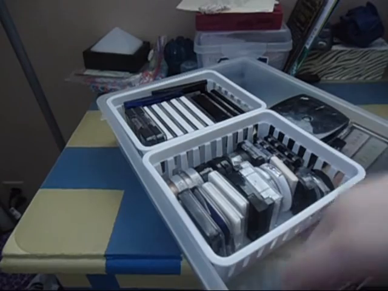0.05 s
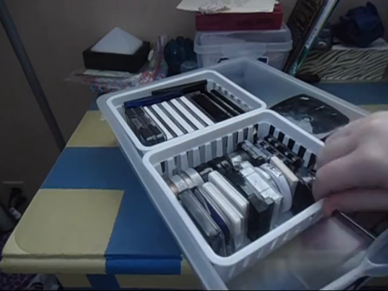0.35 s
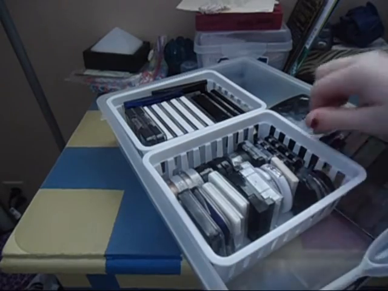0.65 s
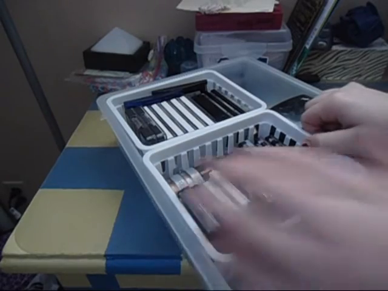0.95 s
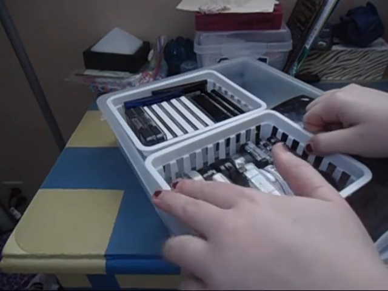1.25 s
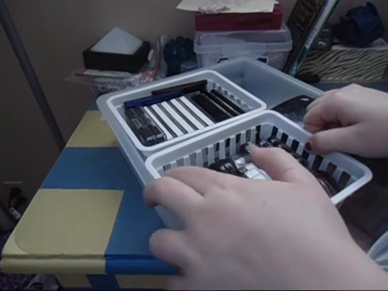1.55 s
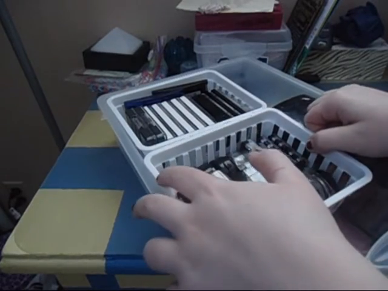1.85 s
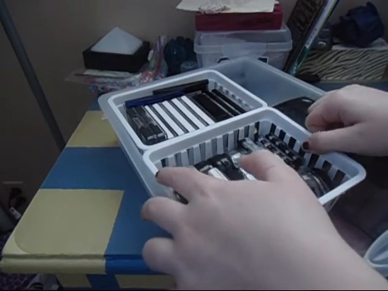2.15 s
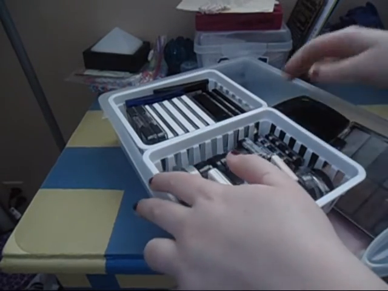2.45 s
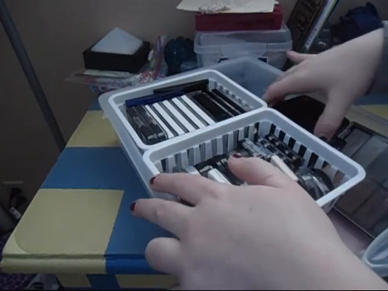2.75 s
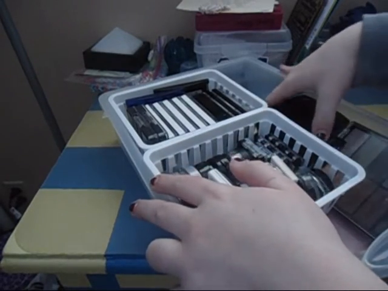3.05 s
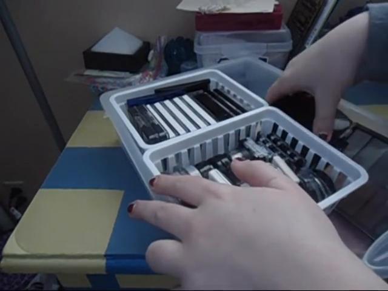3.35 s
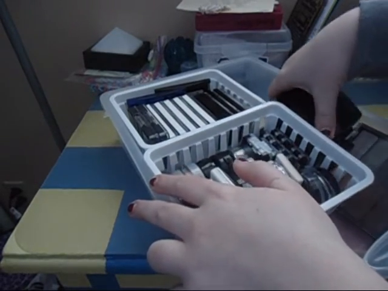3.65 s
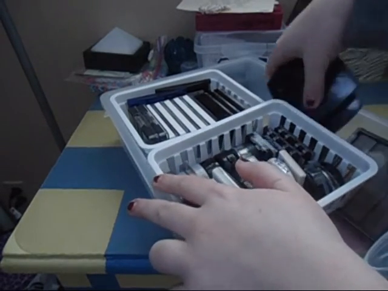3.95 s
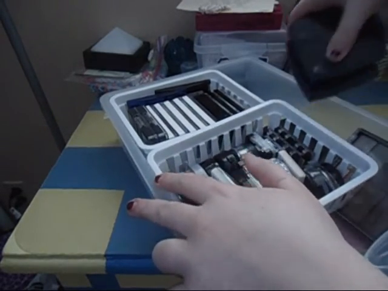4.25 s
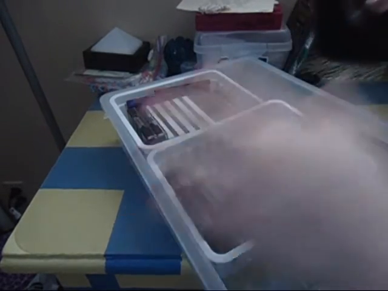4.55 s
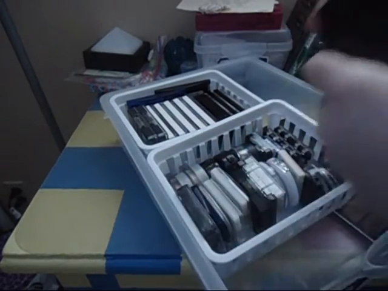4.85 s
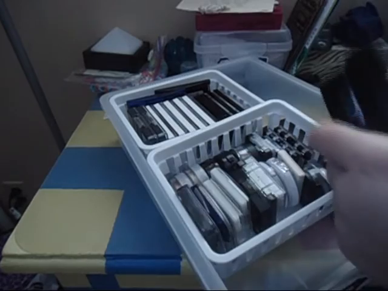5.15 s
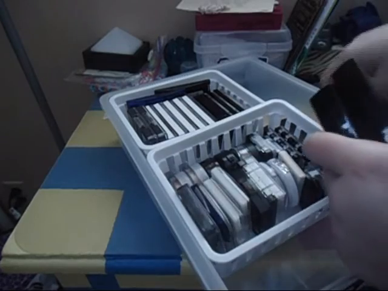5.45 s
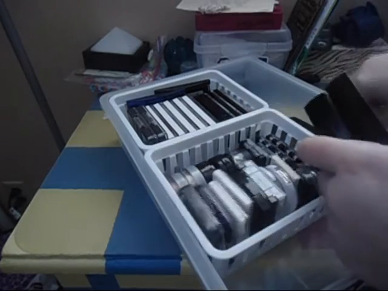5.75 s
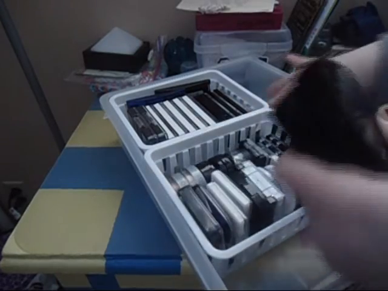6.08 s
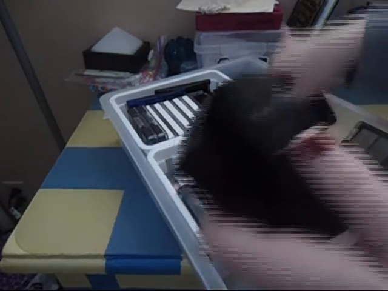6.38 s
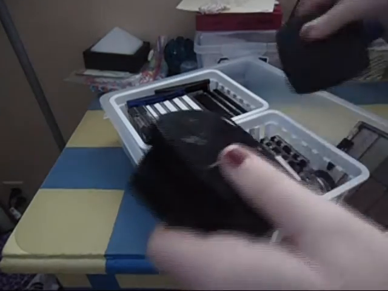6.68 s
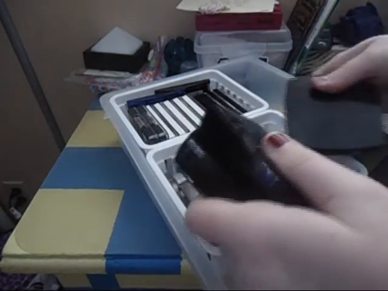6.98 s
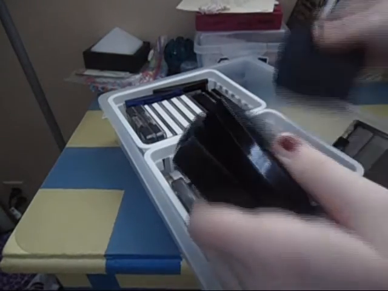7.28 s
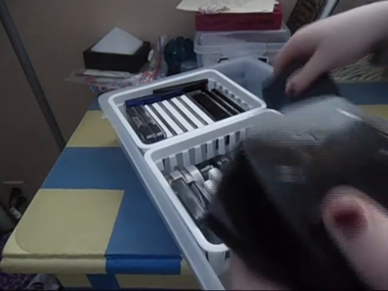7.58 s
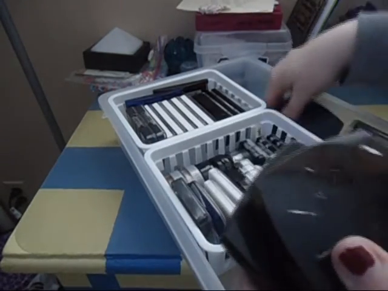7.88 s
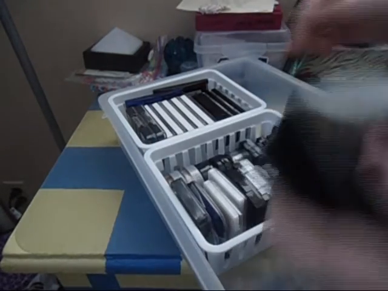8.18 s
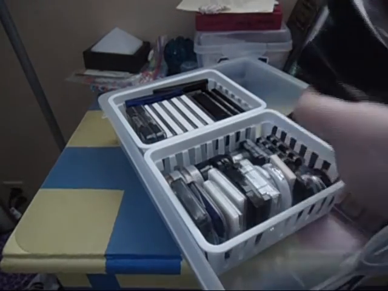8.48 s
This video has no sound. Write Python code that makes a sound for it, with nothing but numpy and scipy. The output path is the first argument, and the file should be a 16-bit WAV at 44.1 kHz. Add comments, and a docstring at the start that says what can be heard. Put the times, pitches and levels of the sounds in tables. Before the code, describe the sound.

In a small furnished room, plastic cases tick and rub softly against each other and a basket wall. The knocks grow firmer until a tight, squeaky slide breaks into a short rattling clatter. Lighter clacks follow, then several hollow knocks on a plastic tub and a last rub. The sound is dull and only in the left channel, over low room rumble and microphone hiss.

```python
"""Plastic make-up compacts are sorted by hand in a basket inside a storage tub, in a small furnished room.
First, light knocks, fingertip squeaks, taps on the basket wall and the dry rasp of sliding cases.
The knocks firm up; near 5.4 s a tight slide squeaks into the loudest clatter, then a smaller flurry.
From 7.5 s the held compact knocks on the tub, and a few last ticks and rubs close the scene.
A dull little microphone, live on the left only, hears it all over room rumble and its own hiss."""
import sys
import numpy as np
from scipy import signal
from scipy.fft import rfft, irfft
from scipy.io import wavfile
from scipy.ndimage import uniform_filter1d, map_coordinates

SR = 44100
rng = np.random.default_rng(int(sys.argv[2]) if len(sys.argv) > 2 else 0)


def inscribe(sig):
    """Save sig as 16-bit PCM at rate SR to the path in sys.argv[1].

    A 1-D sig is mono; a 2-D sig holds one channel per row.
    Samples are clipped to [-1, 1] before scaling.
    """
    pcm = np.round(np.clip(np.atleast_2d(sig).T, -1, 1) * 32767)
    wavfile.write(sys.argv[1], SR, pcm.astype(np.int16))


N = 380141

# Room rumble and microphone hiss. Each row: frequency in Hz, relative level in dB.
FLOOR_SPECTRUM = [(15, -4.5), (30, 2.5), (80, 0), (160, -5), (400, -10.5), (1000, -16), (2500, -20.5),
                  (4500, -22.5), (9000, -27.5)]
# Case against case. Each row: start in seconds, level in dB, shell resonance in Hz,
# hardness of the contact in dB, seconds until the rebound (0 for a case held fast).
CASE_KNOCKS = [(0.13, -53, 983, -13, 0.0097), (0.514, -52.5, 1196, -23, 0), (0.624, -50.5, 1003, -5.5, 0),
               (0.938, -62.5, 900, -7, 0.012), (1.048, -62.5, 1380, -10, 0.016),
               (1.203, -57.5, 840, -12, 0.024), (1.287, -56, 855.8, -14.5, 0.0074),
               (1.312, -68.5, 1500, 3, 0.0016), (1.352, -60, 590, -8, 0.008),
               (1.409, -65.5, 1300, 2, 0.012), (2.111, -51, 850, -11, 0), (2.22, -57, 494, -1, 0.00015),
               (2.33, -52.5, 1510, -4.5, 0), (2.366, -54, 1042, 11, 0.001), (2.456, -53.5, 639, -7.5, 0),
               (2.711, -55.5, 720, -17, 0.023), (2.81, -58.5, 723, -14, 0.016),
               (3.24, -59, 925, -6, 0.0069), (3.337, -54, 561, -34, 0.0206),
               (3.383, -50, 775.8, -10.5, 0.006), (3.434, -58, 798, -8, 0.028),
               (3.52, -51.5, 1176, -31, 0.011), (3.717, -37, 589, -11.5, 0.0093),
               (3.766, -40.5, 566, -35, 0), (3.803, -50, 595, -19, 0.027),
               (3.829, -56.5, 696, 3.5, 0.00086), (3.882, -49, 596, -17.5, 0.012),
               (3.984, -44, 583, -23, 0), (4.022, -47, 1012, -13, 0.0069),
               (4.095, -60.5, 1370, -31, 0.0025), (4.243, -51.5, 658, -4.5, 0.027),
               (4.384, -46.5, 517.8, -15.5, 0.018), (4.589, -49.5, 1020, -14, 0.005),
               (4.81, -70, 1392, 2, 0.0025), (4.86, -59, 855, 5, 0.0046), (4.891, -59.5, 850, -5, 0.0086),
               (5.182, -47, 296, -25, 0.00087), (5.284, -36, 1045, -16, 0),
               (5.407, -39.5, 1120, -10, 0.00795), (5.496, -19, 1290, -7.5, 0.00047),
               (5.497, -25.5, 480, -14, 0), (5.61, -25, 1320, -9.5, 0), (5.611, -33, 700, -11.5, 0.018),
               (5.648, -23, 814, -15, 0), (5.66, -24, 718, -11, 0.0018), (5.676, -34, 1150, -8.5, 0),
               (5.723, -39, 682.6, -12.5, 0.0019), (5.745, -22.5, 490, -5.5, 0.0016),
               (5.766, -33.5, 930, -7, 0), (5.78, -21, 776, -5, 0.0139), (5.806, -20, 580, 3, 0.0048),
               (5.81, -22.5, 1240, -4, 0.0035), (5.817, -27, 1166, 1, .01), (5.863, -45, 1342, 5, 0.012),
               (5.889, -43, 1327, -4, 0.0024), (5.935, -60.5, 1290, 8.5, 0.0018),
               (6.238, -46, 985, -17.5, 0.023), (6.308, -53, 1191, -15.5, 0),
               (6.45, -40.5, 336.4, -2, 0.0048), (6.47, -35.5, 700, 3.5, 0.002),
               (6.478, -32, 610.2, -2, 0.01), (6.511, -39, 780, -8, 0.029),
               (6.54, -43, 520.6, -8.5, 0.00097), (6.554, -35, 719.5, -12.5, 0.0012),
               (6.592, -46.5, 1202, -12, 0.01), (6.617, -51.5, 1100, -12, 0.0024),
               (6.863, -50.5, 792, -9, 0.0088), (7.077, -45, 567.2, -9.5, 0), (7.132, -43, 941.1, -8.5, 0),
               (7.156, -55.5, 567.2, 3, 0.013), (7.271, -50.5, 570, -5.5, 0.01),
               (7.405, -54.5, 1620, -11, 0), (8.422, -53.5, 1420, 0, 0.015), (8.47, -39, 939, -5.5, 0),
               (8.524, -54, 1332, 1, 0.0113)]
# Sympathetic ring of basket and tub. Each row: pitch in Hz, relative level in dB,
# t60 in seconds before the cases damp it.
BASKET_MODES = [(197, -8, 0.15), (363, 3, 0.36), (460, 7.5, 0.13), (574.6, 7, 0.2), (1063, 2, 0.18),
                (1280, 5, 0.15), (1446, 1.5, 0.18), (2060, 2.5, 0.2), (2240, 4, 0.15), (2432, 3.5, 0.16),
                (2670, 3.5, 0.099), (2845, 5, 0.16), (3270, 3.5, 0.16), (4074, 1, 0.14)]
# Fingertips on a lid. Each row: start and end in seconds, squeak level in dB, pitch in Hz.
FINGERTIP_RUBS = [(0.677, 0.778, -80, 2540), (6.587, 6.641, -70, 2480), (7.43, 7.489, -73.5, 1645),
                  (7.74, 7.839, -69, 2420), (8.602, 8.655, -56.5, 2500)]
# The dry colour of rubbed plastic. Each row: frequency in Hz, relative level in dB.
RASP_SPECTRUM = [(150, -4), (400, -17.5), (1000, -2.5), (1500, 7), (1950, 0.5), (2550, 4), (2850, 2),
                 (3200, 0.5), (3700, -3.5), (4300, -3.5), (5000, -6), (6500, -5.5), (9000, -22)]
# Taps on the basket wall. Each row: start in seconds, ring level in dB, pitch of the struck spot in Hz,
# hardness in dB, fall of the modes away from that pitch in dB per octave.
WALL_STRIKES = [(0.844, -46.5, 1390, -0.5, 19), (0.858, -52, 1376, -2, 7), (1.502, -39.5, 1110, -7, 17),
                (1.641, -44, 1580, 8.5, 7), (1.646, -41.5, 664, -14, 17), (1.656, -52.5, 632, 6.5, 4),
                (2.034, -43.5, 600, 4, 6.5), (3.679, -37, 910, -1, 1), (3.922, -32.5, 1336, -2, 3),
                (3.929, -37, 560, -6, 12), (4.607, -41, 950, -6.5, 0), (6.337, -49, 1142, -12, 18)]
# Voice of the hollow basket wall. Each row: pitch in Hz, relative level in dB, t60 in seconds.
WALL_MODES = [(389.2, -5.5, 0.046), (548, -3, 0.05), (769, 1, 0.037), (930, 1.5, 0.026),
              (1060, -10.5, 0.034), (1253, -13, 0.065), (1400, -1, 0.039), (1470, 2.5, 0.018),
              (1597, -2.5, 0.037), (1840, -21, 0.057), (2670, -22, 0.04), (3140, -18, 0.09),
              (3790, -13, 0.04), (4215, -12, 0.04)]
# Case sliding on case. Each row: start and end in seconds, rasp level in dB, shell resonance in Hz,
# level of the hollow ring in dB.
CASE_SLIDES = [(1.1, 1.251, -79, 700, -64), (1.425, 1.65, -67.5, 840, -66.5),
               (1.497, 1.509, -52, 1300, -54), (2.013, 2.042, -61, 895, -57.5),
               (2.04, 2.089, -66.5, 650, -61), (2.191, 2.383, -71.5, 609, -67),
               (2.356, 2.364, -60, 900, -72.5), (3.212, 3.248, -64, 940, -62.5),
               (3.289, 3.453, -70, 760, -60), (3.473, 3.597, -67, 930, -57.5),
               (3.577, 3.753, -61, 1068, -58.5), (3.708, 3.87, -63, 600, -59), (3.924, 4.07, -61, 880, -56),
               (4.01, 4.047, -63, 1160, -60), (4.2, 4.265, -64, 900, -88),
               (5.265, 5.443, -64.5, 960, -58.5), (5.399, 5.54, -52, 1336, -55.5),
               (5.498, 5.571, -66, 632, -49), (5.61, 5.738, -47, 1252, -59), (5.701, 5.843, -43, 1050, -66),
               (5.812, 5.919, -41, 1000, -48.5), (6.274, 6.378, -63, 1084, -56),
               (6.338, 6.43, -57.5, 988, -65.5), (6.415, 6.481, -50, 950, -55.5),
               (6.463, 6.529, -44.5, 860, -51.5), (6.576, 6.637, -67, 950, -61),
               (7.098, 7.156, -69, 924, -63), (7.648, 7.727, -59.5, 790, -54.5),
               (7.921, 7.991, -52, 950, -52), (8.031, 8.103, -54.5, 965, -55.5),
               (8.084, 8.123, -53.5, 802, -53), (8.453, 8.496, -63.5, 875, -69),
               (8.483, 8.735, -60.5, 1120, -67)]
# Voice of the tightest slide. Each row: centre pitch in Hz, width in Hz, relative level in dB.
SQUEAK_RESONANCES = [(1290, 130, -7.5), (1600, 250, -8), (2390, 130, -2.5), (3100, 260, 4.5),
                     (3700, 260, -6), (4750, 410, -6)]
# The held compact on the tub. Each row: start in seconds, ring level in dB, pitch of the struck spot
# in Hz, hardness in dB, fall of the modes away from that pitch in dB per octave.
TUB_STRIKES = [(7.5645, -22.5, 527, -7.5, 3), (7.567, -26.5, 890, -5.5, 5), (7.648, -31.5, 700, -2.5, 2.5),
               (7.669, -39.5, 495, -2, 2), (7.919, -29.5, 650, -7.5, 5), (7.937, -35, 700, -9, 6),
               (7.959, -32, 824, -6.5, 15), (8.0697, -23, 825, -6.5, 21), (8.096, -33.5, 820, -3.5, 10.5)]
# Voice of that compact, damped by fingers. Each row: pitch in Hz, relative level in dB, t60 in seconds.
COMPACT_MODES = [(373, 1, 0.032), (558, -4, 0.062), (700, -5, 0.043), (781, -3, 0.048), (880, -1, 0.044),
                 (1010, -1, 0.049), (1290, -3.5, 0.044), (1414, -4, 0.035), (1594, -6.5, 0.041),
                 (1855, -9, 0.043), (2157, -6, 0.048), (2444, -11, 0.06), (2676, -11, 0.058),
                 (3230, -17, 0.093)]
# The microphone's dull tone. Each row: frequency in Hz, gain in dB.
MIC_RESPONSE = [(100, 8.5), (4000, 4), (4900, 2.5), (5550, -7.5), (6200, -4), (7000, -12.5), (7600, -15),
                (8200, -26.5)]

TOP_HZ = 8000  # treble cut-off
MIDDLING_DB = -35  # a middling blow; thud and rattle are scaled from it


def undb(db):
    """Decibels to gain."""
    return 10 ** (np.asarray(db) / 20)


def level(x, db):
    """Scale to an rms level."""
    return x * undb(db) / np.sqrt(np.mean(x ** 2))


def crest(x, db, size=132):
    """Scale so that the loudest few milliseconds have this level."""
    return x * undb(db) / np.sqrt(uniform_filter1d(x ** 2, size).max())


def fade(t, t60):
    """Exponential decay, 60 dB in t60 seconds."""
    return np.exp(-np.log(1000) * t / max(t60, 1e-3))


def band(x, lo_hz, hi_hz, order=3):
    """Causal band-pass."""
    sos = signal.butter(order, [lo_hz, min(hi_hz, SR / 2 - 1)], "band", fs=SR, output="sos")
    return signal.sosfilt(sos, x)


def colour(x, points, size=4096):
    """Causal EQ through (Hz, dB) points, made from the folded cepstrum."""
    hz, db = np.transpose(points)
    gain = undb(np.interp(np.log(np.fft.rfftfreq(size, 1 / SR) + 1), np.log(hz), db))
    cepstrum = irfft(np.log(gain))[:size // 2]
    cepstrum[1:] *= 2
    return signal.fftconvolve(x, irfft(np.exp(rfft(cepstrum, size))))[:len(x)]


def wander(rate):
    """A random value that glides to a new level this many times a second."""
    return np.interp(np.arange(N) / SR * rate, np.arange(N), rng.standard_normal(N))


def add(track, start, x):
    """Mix a sound into the track at a time in seconds."""
    i = max(int(start * SR), 0)
    track[i:i + len(x)] += x[:max(N - i, 0)]


def noise_floor(db=-62.5):
    """A steady bed of room rumble and microphone hiss."""
    return level(colour(rng.standard_normal(N), FLOOR_SPECTRUM), db)


def knock(shell_db, shell_hz, thud_db, clack_db, tick_db, ring_s, rise_s=0.00057, size=8192):
    """One contact: a shell note among dense, quickly damped plate modes, over a thud of the basket."""
    t = np.arange(size) / SR
    contact = 1 - np.exp(-t / rise_s)  # the force builds as the edges press together
    snap = undb(8) * (np.arange(size) == int(rise_s * SR))  # the first sharp touch

    def plate(lo_hz, hi_hz, t60, order=3):
        """Waves scattering through the case."""
        scatter = rng.choice([-1., 1.], size) * contact * fade(t, t60)
        return band(snap + scatter, lo_hz, hi_hz, order)

    # the fingers hold the case, so its main note is the first to die
    note = np.sin(2 * np.pi * shell_hz * t) * contact * fade(t, ring_s * .75)
    neighbours = plate(min(shell_hz * .7, 600), np.clip(shell_hz * 1.8, 1100, 1750), ring_s)
    shell = crest(note, 0) + crest(neighbours, 0)
    thud = plate(155, 490, ring_s * 1.44, order=2)
    clack = plate(1900, 3870, ring_s * 0.97)
    tick = plate(4500, 7150, ring_s * 0.94)
    return crest(shell, shell_db) + crest(thud, thud_db) + crest(clack, clack_db) + crest(tick, tick_db)


def held_cut_db(hz, held_hz=790, width_octaves=0.13, depth_db=-7):
    """Blows near the pitch of the large compact in the hand spare the basket by this much."""
    return depth_db * np.exp(-(np.log2(hz / held_hz) / width_octaves) ** 2)


def blow(db, hz, hard_db):
    """A hard contact brings out clack, tick and thud and is soon over; a soft one rings longer."""
    thud_db = -41.5 + 0.83 * (db - MIDDLING_DB) + 0.42 * hard_db + held_cut_db(hz)
    clack_db = db + hard_db
    ring_s = 0.031 * 2 ** (-hard_db / 39)  # 39 dB of hardness halves the ring
    return knock(db, hz, thud_db, clack_db, tick_db=clack_db - 4, ring_s=ring_s)


def rattle(sound, touches_per_s=560, after_s=0.0031, t60=0.15, size=6000):
    """A loose case chatters as it settles: a scatter of fading repeats of its contact."""
    t = np.arange(size) / SR
    touches = (rng.random(size) < touches_per_s / SR) * rng.uniform(-1.7, 1, size) * (t > after_s)
    return undb(-13.5) * signal.fftconvolve(sound, touches * fade(t, t60))


def case_knocks(rebound_db=-7):
    """Cases meet; loose ones rebound and rattle. Returns the sound and the part that shakes the basket."""
    out, shake = np.zeros(N), np.zeros(N)
    for start, db, hz, hard_db, rebound_s in CASE_KNOCKS:
        first = blow(db, hz, hard_db)
        add(out, start, first)
        add(shake, start, first * undb(held_cut_db(hz)))
        if rebound_s > 0:
            add(out, start + rebound_s, blow(db + rebound_db, hz, hard_db))
            choke_db = -0.4 * max(db - MIDDLING_DB, 0)  # a firm blow pins the case
            add(out, start, rattle(first) * undb(choke_db))
    return out, shake


def basket_ring(x, gain_db=-59, damping=1.406):
    """The basket and tub ring on faintly in sympathy, damped by the cases in them."""
    t = np.arange(SR // 2) / SR
    ring = sum(undb(db) * np.sin(2 * np.pi * (hz * t + rng.random())) * fade(t, t60 / damping)
               for hz, db, t60 in BASKET_MODES)
    return undb(gain_db) * signal.fftconvolve(x, ring)[:N]


def table_boom(x, gain_db=1.0, t60=0.12):
    """The table under the basket takes up the low end of each blow and booms briefly."""
    decay = fade(np.arange(SR // 4) / SR, t60)
    boom = band(rng.standard_normal(len(decay)), 55, 170, order=2) * decay
    return undb(gain_db) * signal.fftconvolve(x, boom / np.linalg.norm(decay))[:N]


def room_tail(x, gain_db=-13, treble_db=1, low_t60=0.152, high_t60=0.18, delay_s=0.0042):
    """A small furnished room: a short diffuse tail, the treble lasting a touch longer."""
    t = np.arange(SR // 2) / SR
    low = band(rng.standard_normal(len(t)), 70, 1700) * fade(t, low_t60)
    high = band(rng.standard_normal(len(t)), 1300, 8500) * fade(t, high_t60)
    build_up = np.clip(t / delay_s - 1, 0, 1)
    tail = (low + undb(treble_db) * high) * build_up
    return undb(gain_db) * signal.fftconvolve(x, tail / np.linalg.norm(fade(t, low_t60)))[:N]


def settling_ticks(count=36, mean_db=-65, spread_db=3):
    """Cases settle under the resting hand: faint ticks sprinkled across the scene."""
    out = np.zeros(N)
    for when, strength, octaves in rng.random((count, 3)):
        db = mean_db + spread_db * (2 * strength - 1)
        tick = knock(db, 600 * 2 ** octaves, thud_db=db - 4, clack_db=db - 2, tick_db=db - 2, ring_s=.025)
        add(out, when * N / SR, tick)
    return out


def finger_rubs(width_hz=170, judder_db=4, judder_per_s=160, rasp_db=-5):
    """Fingertips drag on a glossy lid: an uneven rasp with a thin squeak in one resonance."""
    out = np.zeros(N)
    t = np.arange(N) / SR
    judder = rng.standard_normal(N) * undb(judder_db * wander(judder_per_s))
    for start, end, db, hz in FINGERTIP_RUBS:
        drag = judder[(t > start) & (t < end)]
        drag = drag * np.hanning(len(drag)) ** .5
        squeak = band(drag, hz - width_hz / 2, hz + width_hz / 2, order=1)
        rasp = colour(drag, RASP_SPECTRUM)
        add(out, start, level(squeak, db) + level(rasp, db + rasp_db))
    return out


def hollow_taps(strikes, modes, case_db, rise_s, size=8192):
    """Each blow rings a hollow body, favouring the modes near the pitch of the struck spot."""
    out = np.zeros(N)
    t = np.arange(size) / SR
    contact = 1 - np.exp(-t / rise_s)
    for start, db, spot_hz, hard_db, db_per_octave in strikes:
        ring = np.zeros(size)
        for hz, mode_db, t60 in modes:
            gain = undb(mode_db - db_per_octave * abs(np.log2(hz / spot_hz)))
            ring += gain * np.sin(2 * np.pi * (hz * t + rng.random())) * fade(t, t60)
        ring = band(ring * contact, 170, TOP_HZ, order=2)  # the ring carries nothing below about 170 Hz
        add(out, start, crest(ring, db) + blow(db + case_db, spot_hz, hard_db))
    return out


def wall_taps():
    """Cases tap the basket wall, which answers with a short hollow note."""
    return hollow_taps(WALL_STRIKES, WALL_MODES, case_db=-8, rise_s=0.00043)


def case_slides(catches_per_s=6000, grip_db=1.5, grip_per_s=90, stall_db=1.9, stall_per_s=35, grit_db=1.95):
    """Surfaces catch and slip in tiny, uneven jerks that rasp and ring the hollow case."""
    out = np.zeros(N)
    t = np.arange(N) / SR
    catches = (rng.random(N) < catches_per_s / SR) * rng.standard_normal(N)
    uneven_db = grip_db * wander(grip_per_s) + stall_db * wander(stall_per_s)
    catches *= undb(uneven_db + grit_db * rng.exponential(size=N))
    for start, end, rasp_db, hz, shell_db in CASE_SLIDES:
        span = (t > start) & (t < end)
        speed = np.sin(np.pi * (t[span] - start) / (end - start)) ** 0.64  # the hand speeds up, then slows
        friction = catches[span] * speed
        half_width_hz = min(hz * .35, 380)
        hollow = band(friction, hz - half_width_hz, hz + half_width_hz, order=2)
        rasp = colour(friction, RASP_SPECTRUM)
        add(out, start, level(hollow, shell_db) + level(rasp, rasp_db))
    return out


def tight_squeak(start_s=5.423, end_s=5.5, level_db=-41.5, bend=0.06):
    """A tightly held case judders along its neighbour and sings in a few narrow resonances."""
    push = np.hanning(int((end_s - start_s) * SR))
    judder = rng.standard_normal(SR)
    tone = sum(level(band(judder, hz - width / 2, hz + width / 2, order=1), db)
               for hz, width, db in SQUEAK_RESONANCES)
    pitch_ratio = 1 + bend * (push - .5)  # rises and falls with the push
    squeak = map_coordinates(tone, [np.cumsum(pitch_ratio)]) * push ** 0.088
    out = np.zeros(N)
    add(out, start_s, level(squeak, level_db))
    return out


def tub_knocks():
    """The held compact knocks on the tub, its ring cut short by the fingers."""
    return hollow_taps(TUB_STRIKES, COMPACT_MODES, case_db=-4, rise_s=0.00054)


def scene():
    """The plastic sounds, with basket, table and room answering, over the bed; the right is silent."""
    hits, shake = case_knocks()
    handling = case_slides() + tight_squeak() + finger_rubs() + settling_ticks()
    wall = wall_taps()
    plastic = hits + wall + tub_knocks() + handling
    floor = noise_floor()
    resonance = basket_ring(shake + handling) + table_boom(hits + wall + handling) + room_tail(plastic)
    return np.array([plastic + resonance + floor, np.zeros(N)])


def record(dry, safety_limit=0.72):
    """The microphone dulls the treble and cuts off the top end; a safety limit caps the loudest peaks."""
    dulled = np.array([colour(channel, MIC_RESPONSE) for channel in dry])
    capped = np.clip(dulled, -safety_limit, safety_limit)
    return signal.sosfilt(signal.ellip(8, .2, 60, TOP_HZ, fs=SR, output="sos"), capped)


dry = scene()
out = record(dry)
inscribe(out)
```